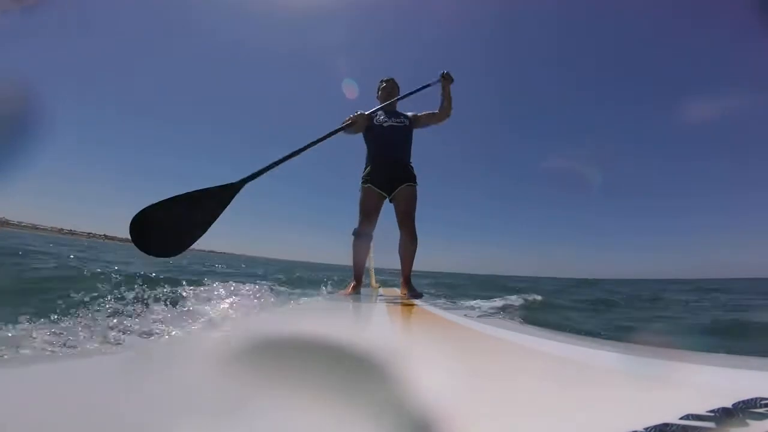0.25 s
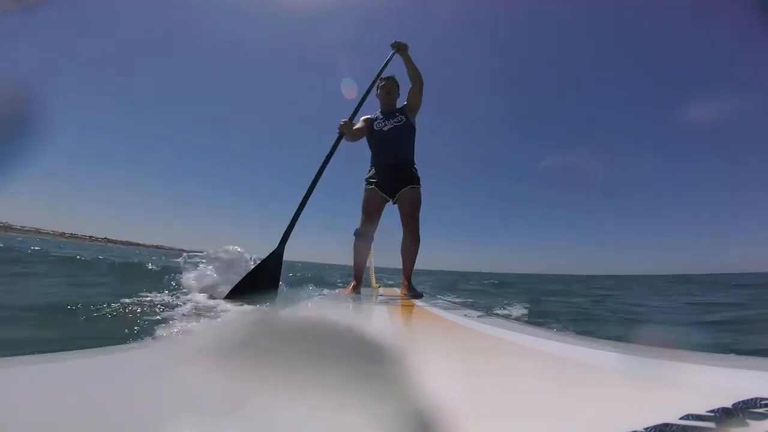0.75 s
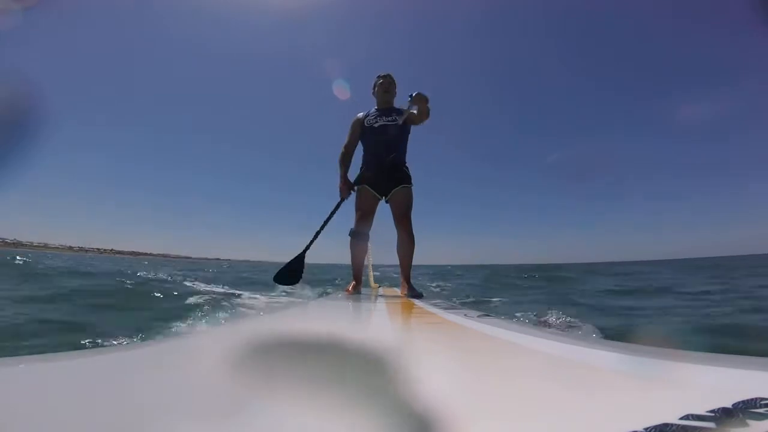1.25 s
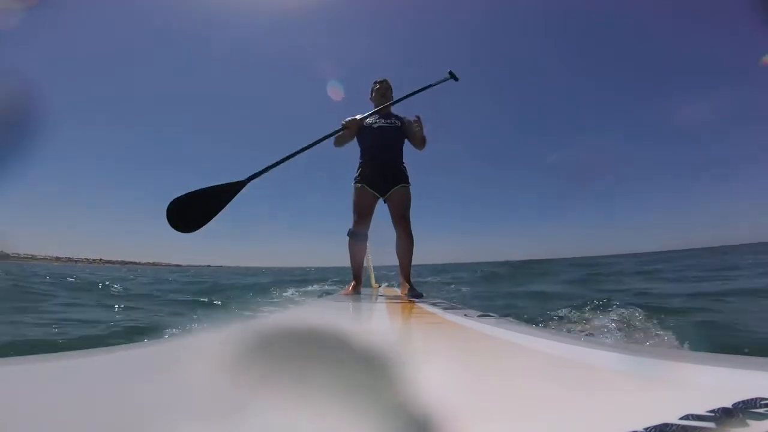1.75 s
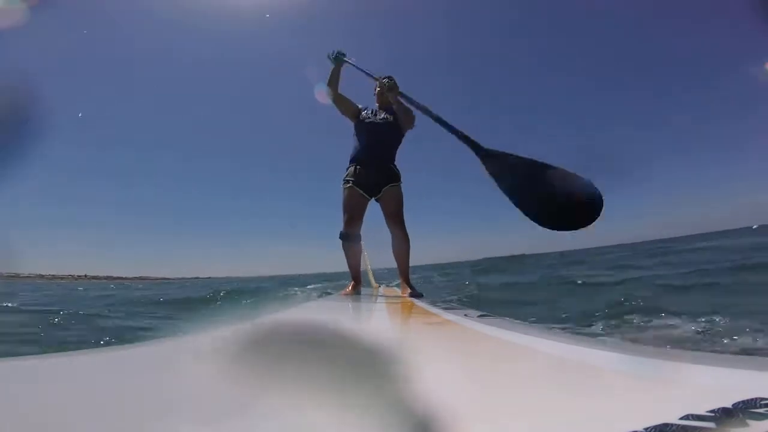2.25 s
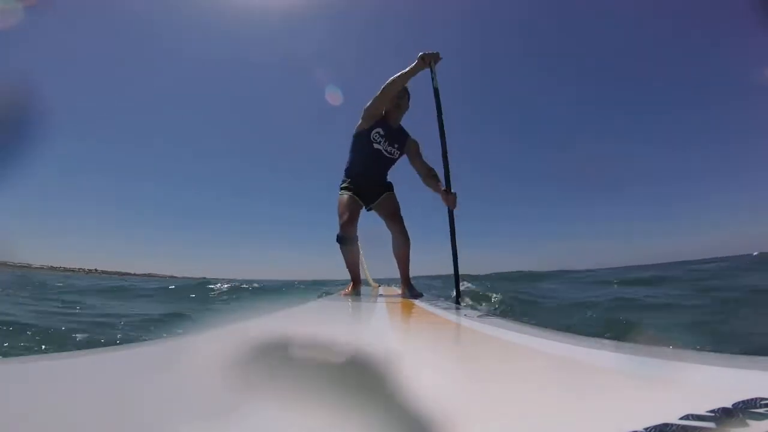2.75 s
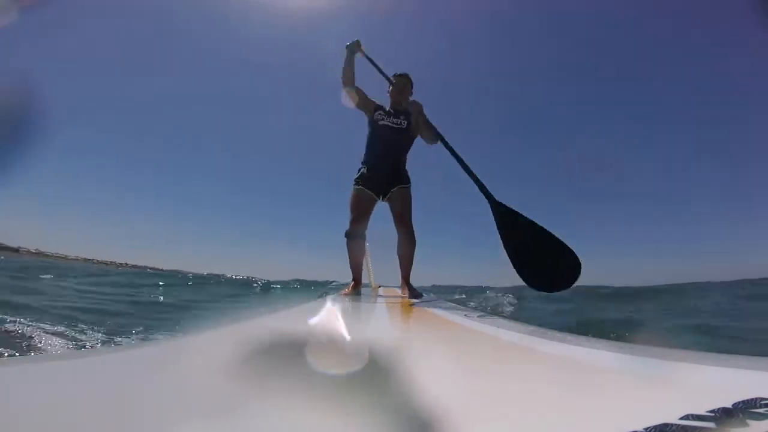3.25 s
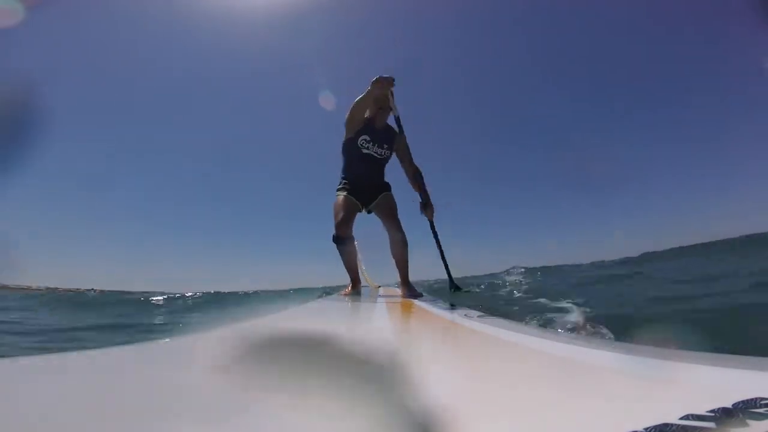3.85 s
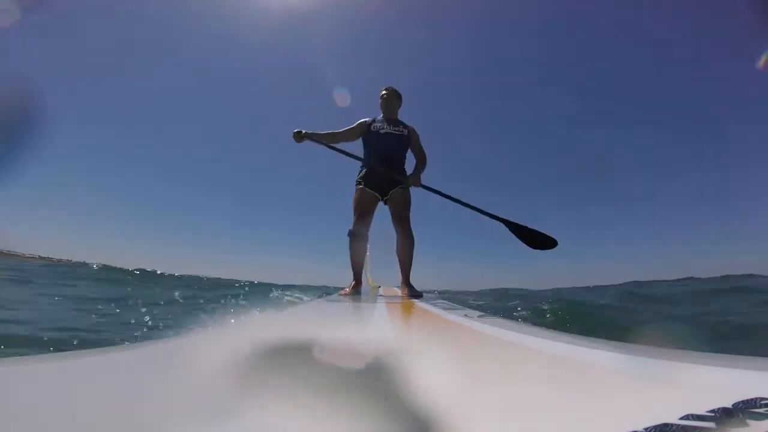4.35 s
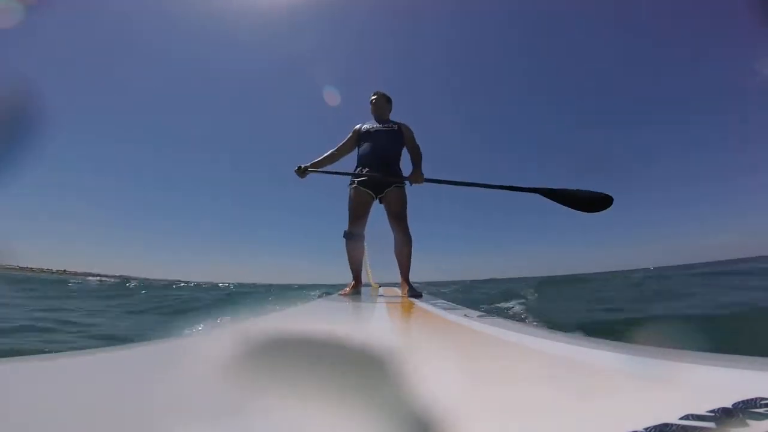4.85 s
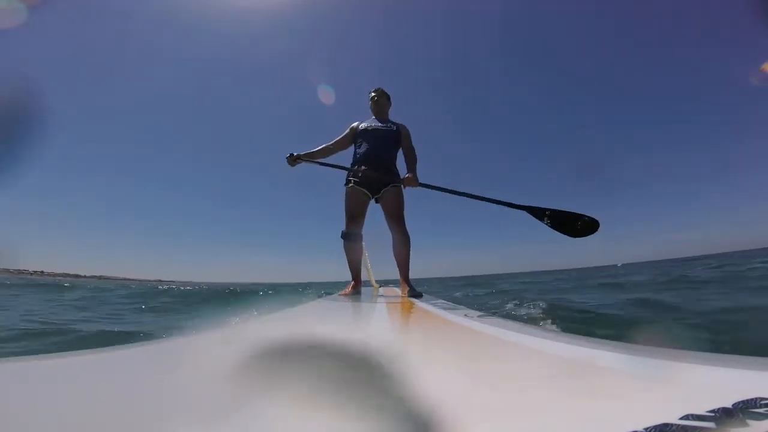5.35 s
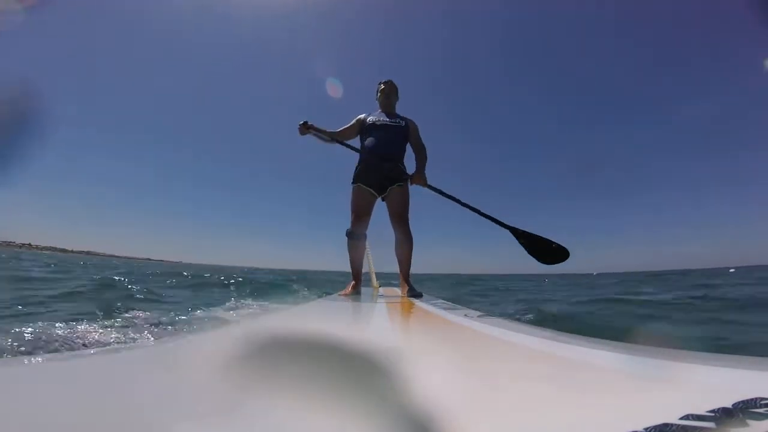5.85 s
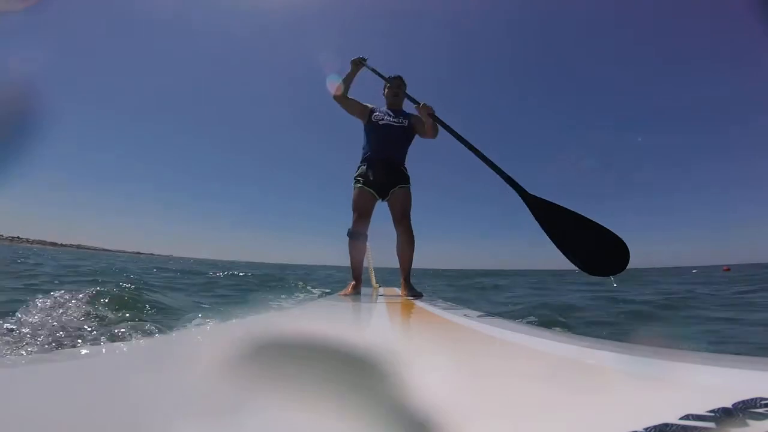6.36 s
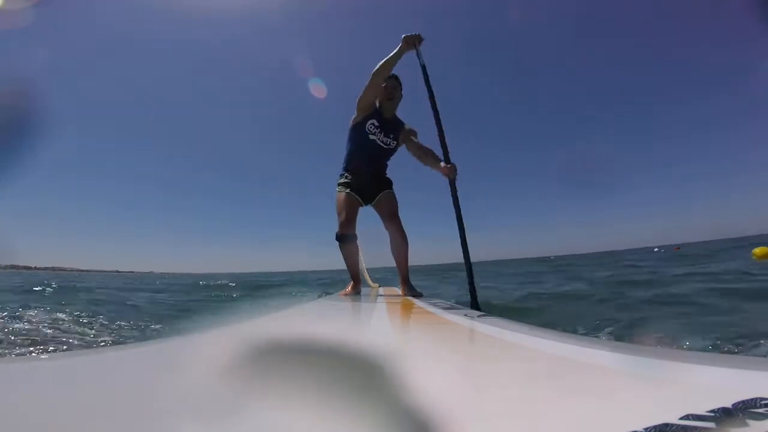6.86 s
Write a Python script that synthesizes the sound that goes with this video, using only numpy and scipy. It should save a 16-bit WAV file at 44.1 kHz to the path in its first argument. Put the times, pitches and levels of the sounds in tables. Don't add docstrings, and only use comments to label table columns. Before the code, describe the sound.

Hollow knocks, bubbling gulps and short slaps of water under a board on open sea, heard very close through a waterproof housing. Early hits and glugs give way to gusty low rumble and fizzing spray, then the densest pounding between four and five and a half seconds. The level drops suddenly, stays sparse, and droplets and gentler chop return at the end. Dry, dull, with no echo.

```python
import sys
import numpy as np
from scipy import signal
from scipy.fft import rfft, irfft
from scipy.io import wavfile
from scipy.ndimage import uniform_filter1d, minimum_filter1d

SR = 44100
rng = np.random.default_rng(int(sys.argv[2]) if len(sys.argv) > 2 else 0)


def digitize_waveform(pressure):
    field = np.atleast_2d(pressure).T
    bounded = np.clip(field, -1, 1)
    quanta = np.round(bounded * 32767).astype(np.int16)
    wavfile.write(sys.argv[1], SR, quanta)


def boost(x):
    u = np.asarray(x, float) / 20
    return 10 ** u


N = 312669

# time_s, level_db, gust_edge_db
WIND_LEVELS = [(0.1, -50, -8), (0.6, -42, -22.5), (1.05, -42, -35), (1.23, -44, -25), (2.53, -41, -8.5),
               (2.82, -29, -7), (2.94, -42.5, -7), (3.58, -34, -7.5), (3.78, -36.5, -1.5),
               (3.82, -21.5, -4.5), (4.17, -39, -14), (4.7, -36, -32.5), (4.83, -41, -24), (4.9, -34, -15),
               (5.92, -49, -6.5), (6.89, -36.5, -10), (7.03, -36, -13), (7.09, -44, 6)]
# start_s, peak_db, pitch_hz
SHOVES = [(0.59, -20, 35), (0.753, -21, 88), (0.793, -24, 88), (1.025, -18, 85), (2.13, -19.5, 177),
          (2.584, -20, 38.6), (2.697, -20, 56), (2.747, -16, 80.6), (2.794, -14, 102), (2.815, -14.5, 64),
          (2.878, -23, 37.3), (3.05, -30, 55), (3.14, -28, 40), (3.1, -21, 140), (3.258, -21, 66),
          (3.374, -15.5, 116), (3.389, -19, 35.2), (3.45, -31, 35.3), (3.539, -20, 71), (3.798, -12, 62.6),
          (3.815, -15, 62), (3.832, -15, 55), (3.845, -20, 130), (3.868, -17, 57), (3.94, -14, 40.2),
          (4.048, -21, 79), (4.246, -12, 83), (4.348, -20, 91), (4.407, -22, 94), (4.664, -27, 87),
          (5.16, -22, 86), (5.474, -16.5, 82), (6.695, -16, 184), (6.6, -21, 200), (6.996, -22, 113)]
# time_s, level_db
SPRAY_LEVEL = [(0.03, -55), (0.18, -52), (1.12, -54), (2.23, -53.5), (2.29, -57.5), (2.65, -48), (3.1, -46),
               (3.16, -39.5), (3.34, -45.5), (3.49, -46.5), (3.58, -58), (3.64, -50), (5.42, -49.5),
               (5.466, -60.5), (6.13, -54.5), (6.44, -49.5), (6.82, -55.5), (7.09, -52.5)]
# centre_s, over_steady_froth_db, length_s
FROTH_BURSTS = [(0.75, -3.5, 0.07), (2.408, 2, 0.0097), (2.633, 0.5, 0.014), (2.728, 3.5, 0.019),
                (2.85, 1, 0.13), (3.016, 4, 0.018), (3.135, 4, 0.019), (3.158, 0.5, 0.0091),
                (3.21, -2, 0.021), (3.242, -1, 0.0074), (3.26, 6.5, 0.018), (3.3, 3, 0.022),
                (3.347, 3, 0.019), (3.403, -3.5, 0.019), (3.438, 2, .01), (3.59, 2.5, 0.037),
                (4.037, -4, 0.037), (4.103, 4.5, 0.049), (4.237, 5.5, 0.045), (4.542, 7, 0.023),
                (6.014, -1, 0.035), (6.18, 1.5, 0.013), (6.653, 5, 0.11), (6.864, 6.5, 0.03)]
# pitch_hz, level_db (per Hz)
FROTH_SLOPE = [(210, -30), (350, -14), (493, -5), (771, -3.5), (2630, -9), (3400, -11.5), (4420, -24),
               (7480, -120)]
# start_s, peak_db, final_pitch_hz
DROPLETS = [(2.413, -25.5, 3840), (2.634, -20.5, 3500), (2.702, -25, 2100), (2.9774, -23, 2580),
            (3.006, -23, 2710), (3.133, -26, 3520), (3.163, -23, 1930), (3.262, -19, 3530),
            (3.27, -20, 1860), (3.335, -36, 3550), (3.356, -24, 2020), (3.436, -21, 3640),
            (3.546, -10, 3520), (3.625, -22, 3560), (3.6662, -24, 3900), (3.855, -22, 3240),
            (3.855, -21, 3950), (4.053, -22, 3480), (4.095, -25, 3680), (4.087, -21, 3170),
            (3.576, -31, 3500), (4.861, -24, 1990), (4.962, -21, 3070), (5.035, -23, 2960),
            (6.331, -24, 2400), (6.416, -12.5, 3780), (6.418, -20.5, 4850), (6.331, -25, 3260),
            (6.718, -24, 1940), (6.751, -24, 3460), (6.757, -27, 1900), (6.971, -30, 2340),
            (7.058, -23, 3330)]
# start_s, peak_db
SPRAY_TICKS = [(1.267, -39), (1.605, -37), (2.176, -37), (2.222, -31.5), (2.4448, -37), (2.6454, -33.5),
               (2.666, -25.5), (3.1403, -30), (3.164, -27), (3.1847, -28), (3.434, -34), (3.458, -30),
               (3.624, -27.5), (3.7683, -30.5), (3.8546, -30), (4.094, -28.5), (3.5455, -36), (4.9002, -36),
               (4.915, -27), (4.9472, -36), (5.214, -29), (6.052, -35), (6.415, -30.5), (6.7301, -29)]
# time_s, level_db
HULL_FLOW = [(0.03, -47.5), (0.39, -46), (0.41, -33.5), (1.22, -35.5), (2.27, -35), (2.34, -50),
             (2.61, -47.5), (2.74, -42.5), (3.15, -42), (4.3, -32.5), (4.83, -39), (4.87, -35.5),
             (5.42, -31), (5.55, -45.5), (5.8, -41), (6.14, -60), (6.4, -37), (6.85, -45)]
# crest_s, drumming_db, rushing_over_drumming_db, length_s
WAVELETS = [(0.59, -13, -9, 0.028), (0.735, -22.5, -10, .05), (1.02, -24.5, -3.5, 0.12),
            (1.473, -24.5, -4, 0.12), (1.76, -25.5, -1, 0.15), (1.973, -32.5, 4, 0.047),
            (2.059, -23.5, 0, 0.031), (2.256, -23.5, -5, 0.02), (3.26, -44, -4, 0.11),
            (3.542, -28, -8, 0.096), (3.635, -24.5, -1.5, 0.025), (3.84, -33, -9, 0.045),
            (3.962, -24.5, 5.5, 0.031), (4.117, -32, 3.5, 0.062), (4.186, -21.5, 1.5, 0.041),
            (4.316, -29.5, 4.5, 0.096), (4.375, -19, -18, 0.05), (4.446, -21.5, 2, 0.02),
            (4.579, -29.5, 8.5, 0.085), (4.971, -24.5, -2, 0.057), (5.06, -28.5, 7.5, 0.032),
            (5.4, -23.5, 0.5, 0.026), (5.475, -22.5, -1, 0.02), (5.587, -26.5, 0, 0.014),
            (5.63, -29.5, -3, 0.083), (6.226, -36, -6.5, 0.068), (6.395, -38, 2, 0.05),
            (6.527, -34.5, 0.5, 0.19), (6.693, -31.5, -3, 0.1), (6.977, -33, -24, 0.022)]
# start_s, peak_db, pitch_hz
HULL_GULPS = [(0.23, -19, 1250), (0.29, -19, 1200), (0.411, -25, 1110), (1.021, -11.5, 630),
              (1.16, -19, 890), (0.595, -15, 1410), (0.72, -9.5, 825), (1.19, -21, 1340),
              (1.244, -15, 1130), (1.354, -7, 1240), (1.562, -11, 1520), (2.145, -8.5, 1250),
              (2.184, -11, 1250), (2.288, -17, 1290), (2.49, -20.5, 585), (2.549, -15, 1090),
              (2.609, -31, 810), (2.645, -19, 1050), (2.662, -25, 1150), (2.831, -17, 1390),
              (2.862, -17, 915), (2.922, -20, 820), (3.009, -17, 1210), (3.039, -18, 1720),
              (3.435, -9, 1140), (3.471, -5.5, 1250), (3.716, -11.5, 1065), (3.937, -7.5, 1360),
              (3.965, -14, 1000), (3.854, -28, 1210), (4.151, -11, 1140), (4.223, -17, 905),
              (4.351, -6, 1250), (4.415, -16, 905), (4.43, -2, 607), (4.458, -4.5, 595), (4.527, -16, 856),
              (4.612, -13, 525), (4.709, -12.5, 1420), (4.856, -10, 1400), (4.918, -14, 1070),
              (5.024, -32, 1330), (5.19, -16, 1000), (5.314, -15, 890), (5.389, -9, 840), (5.582, -13, 920),
              (6.135, -31, 647), (6.234, -20, 610), (6.314, -18, 870), (6.405, -11.5, 940),
              (6.51, -16, 1190), (6.619, -9.5, 970), (6.731, -6.5, 1350), (6.826, -22, 1200),
              (6.846, -21, 774), (7.016, -25, 1030),
              (0.582, -3, 259), (0.605, -12, 610), (0.75, 0.5, 320), (0.975, -8, 288),
                   (1.05, -0.5, 285), (2.058, -6, 285), (3.26, -12, 1710), (3.541, -10, 288),
                   (3.962, -11, 474), (4.186, -10, 610), (4.223, -6, 520), (4.36, -8.5, 1260),
                   (4.367, -11.5, 433), (4.389, -10, 280), (4.415, -8, 600), (4.574, -12.5, 1070),
                   (4.583, -9, 826), (4.872, -9, 397), (4.9, -2.5, 310), (4.903, -13, 1470),
                   (4.919, 1.5, 660), (4.938, -10, 1430), (5.036, -7, 277), (5.046, -10, 1310),
                   (5.347, -10, 650), (5.391, -8, 406), (6.47, -23, 420)]
# start_s, peak_db, pitch_hz, length_s
SKIN_SLAPS = [(0.406, -14, 560, 0.0073), (0.536, -16, 544, 0.068), (0.988, -17, 457, 0.033),
              (1.022, -19, 606, 0.031), (1.161, -15, 458, 0.019), (1.543, -16, 530, 0.008),
              (1.922, -20, 1110, 0.0085), (2.12, -12.5, 503, 0.024), (2.178, -17, 393, 0.0027),
              (2.705, -21.5, 860, 0.012), (3.121, -21, 1100, 0.0089), (3.23, -18, 614, 0.0052),
              (3.261, -27, 1410, 0.064), (3.428, -16, 1010, 0.015), (3.93, -19, 616, 0.016),
              (4.167, -16, 550, 0.013), (4.19, -21, 566, 0.0043), (4.227, -7.5, 536, 0.012),
              (4.343, -14.5, 497, 0.029), (4.421, -9.5, 580, 0.017), (4.53, -22, 430, 0.0052),
              (4.541, -10.5, 452, 0.074), (4.706, -13.5, 620, 0.006), (4.869, -15, 456, 0.063),
              (4.913, -7.5, 652, 0.011), (4.95, -19, 564, 0.035), (5.024, -7.5, 596, 0.0099),
              (5.191, -15, 595, 0.022), (5.317, -14.5, 590, 0.021), (5.339, -8.5, 598, 0.0091),
              (5.436, -13, 620, 0.047), (5.462, -14.5, 417, 0.055), (5.587, -16.5, 510, 0.042),
              (5.671, -17.5, 595, 0.0096), (5.778, -28, 620, 0.014), (6.362, -21, 620, 0.011),
              (6.407, -27, 897, 0.0053), (6.464, -21.5, 1170, 0.022), (6.694, -22.5, 950, 0.013)]
# start_s, peak_db, pitch_hz, t60_s
PANEL_BOOMS = [(0.41, -14, 280, 0.015), (0.573, -14.5, 253.5, 0.25), (0.708, -12, 272, 0.24),
               (0.815, -19, 284, 0.12), (0.873, -20, 277, 0.13), (0.961, -12.5, 270, 0.042),
               (1.028, -23, 304, 0.17), (1.179, -17, 278, 0.11), (1.303, -19, 309, 0.074),
               (1.439, -22, 274, 0.059), (1.485, -10, 287, 0.086), (1.676, -13, 315, 0.054),
               (1.746, -11, 360, 0.026), (1.772, -20, 298, 0.058), (1.963, -17.5, 314, 0.031),
               (2.038, -23, 279, 0.13), (2.055, -20, 293, 0.026), (2.113, -18, 337, 0.036),
               (2.23, -20, 304, 0.058), (2.253, -16, 277, 0.026), (3.19, -24, 307, 0.081),
               (3.267, -18, 294, 0.053), (3.345, -24.5, 292, 0.054), (3.482, -22, 296, 0.086),
               (3.538, -23, 291, 0.065), (3.629, -22, 289, 0.044), (3.972, -6.5, 280, 0.1),
               (4.18, -8, 272, 0.23), (4.29, -16, 287, 0.08), (4.35, -12, 281.5, 0.14),
               (4.426, -11.5, 286, 0.069), (4.53, -12.5, 280, 0.051), (4.568, -8, 276, 0.13),
               (4.612, -9, 353, 0.02), (4.874, -13, 305, 0.045), (4.982, -10.5, 282, 0.063),
               (5.244, -18, 272, 0.081), (5.341, -10, 293, 0.084), (5.465, -1, 286, 0.087),
               (5.6, -17.5, 376, 0.1), (5.75, -30.5, 280, 0.17), (5.83, -30.5, 288, 0.087),
               (6.366, -31, 280, 0.044), (6.411, -15.5, 284, 0.016), (6.457, -20, 262, 0.055),
               (6.511, -14.5, 272, 0.034), (6.566, -18, 279, 0.043), (6.618, -22.5, 291, 0.13),
               (6.689, -22, 275, 0.036), (6.945, -24, 297, 0.064)]
# pitch_hz, width_hz, level_db
PANEL_MODES = [
    (88, 5.6, -8),
    (272, 28.1, 7),
    (326.5, 76, -1.5),
]
# pitch_hz, width_hz, level_db
SKIN_MODES = [(388, 61, 5.5), (480, 87, 4), (574, 26, 1.5), (638, 24, 0), (867, 110, -2), (1000, 227, -1.5),
              (1250, 100, -0.5), (1417, 130, -8.5)]
# pitch_hz, width_hz, level_db
CAVITY_MODES = [
    (3520, 330, 5.5),
    (5070, 530, -16.5),
    (6486, 260, -1),
    (7660, 3480, -11.5),
    (8650, 280, -4.5),
]
# time_s, null_hz
NULL_PATH = [(0, 4150), (1.0, 4020), (2.1, 4000), (3.0, 4090), (3.6, 4100), (3.95, 4480), (4.45, 4300),
             (4.68, 4200), (5.4, 4060), (6.2, 4110), (7.09, 4120)]
# low_hz, high_hz, threshold_over_region_mean_db
EMPTIED_BANDS = [
    (3000, 4600, -16.5),
    (8200, 9900, -10),
    (10300, 14500, 1.5),
]
# time_s, low_hz, high_hz
HISS_EDGES = [(0.6, 12200, 12700), (1.2, 11300, 13600), (2.3, 11000, 14100), (3.2, 11900, 14200),
              (3.5, 11400, 14000), (3.6, 11100, 12900), (4.5, 11600, 12700), (4.8, 11100, 13200),
              (5.4, 11500, 13000), (5.55, 12000, 12100), (5.9, 11500, 13800), (6.6, 11800, 13400),
              (6.8, 11100, 12900)]


def rms_one(x):
    return x / np.sqrt(np.mean(x ** 2) + 1e-20)


def in_time(rows):
    s, *columns = np.transpose(rows)
    return [np.interp(np.arange(N) / SR, s, column) for column in columns]


def drift(rate_hz):
    r = np.exp(-40 * np.pi * rate_hz / SR)
    slow = signal.lfilter([1], [1, -2 * r, r * r], rng.standard_normal(N // 20 + 2002))[2000:]
    return np.interp(np.arange(N) / 20, np.arange(len(slow)), rms_one(slow))


def resonance(x, hz, width_hz):
    r = np.exp(-np.pi * width_hz / SR)
    poles = [1, -2 * r * np.cos(2 * np.pi * hz / SR), r * r]
    return signal.lfilter([(1 - r * r) / 2, 0, (r * r - 1) / 2], poles, x + 1e-18)


def body(x, modes):
    return sum((-1) ** k * boost(db) * resonance(x, hz, width) for k, (hz, width, db) in enumerate(modes))


def sos_filter(x, order, hz, kind="low"):
    return signal.sosfilt(signal.butter(order, hz, kind, fs=SR, output="sos"), x)


def grains(per_s, spread_db):
    sizes = boost(spread_db * np.minimum(rng.exponential(1, N), 5)) * rng.choice([-1, 1], N)
    return rms_one(sizes * (rng.random(N) < per_s / SR))


def evened(x, window_s):
    power = uniform_filter1d(x ** 2, size=int(window_s * SR)) / np.mean(x ** 2)
    return rms_one(x / (power + 0.05) ** 0.4)


def add(out, s, sound):
    at = max(round(s * SR), 0)
    out[at:at + len(sound)] += sound[:N - at]


def swell(t, rise_s, fall_s):
    shape = (1 - np.exp(-t / rise_s)) ** 2 * np.exp(-t / fall_s)
    return shape / shape.max()


def air(size=1024):
    hz, t, frames = signal.stft(rng.standard_normal(N), SR, nperseg=size)
    at = np.minimum((t * SR).astype(int), N - 1)
    low, high = [edge[at] + 300 * drift(20.0)[at] for edge in in_time(HISS_EDGES)]
    inside = (hz[:, None] > low) & (hz[:, None] < high)
    started = t > 0.62
    return signal.istft(frames * inside * started, SR, nperseg=size)[1][:N] * np.sqrt(10)


def hull_water():
    t = np.arange(0, N + 64, 64) / SR
    drum_db = np.interp(t, *np.transpose(HULL_FLOW))
    mean_db = drum_db.mean()
    rush_db = mean_db + 1.12 * (drum_db - mean_db) - 0.5
    for s, db, rush_over_db, length in WAVELETS:
        shape_db = db - 10 * np.abs(t - s) / max(length, 0.005)
        drum_db = np.maximum(drum_db, shape_db)
        rush_db = np.maximum(rush_db, shape_db + rush_over_db)
    return [np.interp(np.arange(N) / SR, t, level) for level in (drum_db, rush_db)]


def wind():
    level_db, edge_db = in_time(WIND_LEVELS)
    white = rng.standard_normal((3, N))
    buffet = evened(resonance(sos_filter(white[0], 2, 25, "high"), 34, 47.0), 0.16)
    bending = evened(resonance(white[2], 83.3, 20.0), 0.17)
    flexed = boost(0.44 * (hull_water()[0] - in_time(HULL_FLOW)[0] - 4.0))
    calm = np.clip(-edge_db / 36.0, 0, 1)
    low = sos_filter(buffet * (1 - 0.5 * calm) + 1.73 * calm * flexed * bending, 8, 115)
    edge = evened(sos_filter(white[1], 2, [120, 240], "band"), 0.11)
    return boost(level_db + 0.5 * drift(14.0)) * (low + boost(edge_db - 1.0) * edge)


def thumps():
    out, t = np.zeros(N), np.arange(SR // 5) / SR
    for s, db, hz in SHOVES:
        swing = swell(t, 0.61 / hz, 0.8 / hz) * np.sin(2 * np.pi * hz * t)
        add(out, s - 0.004, boost(db - 8.0) * swing)
    return out


def pop(start_s=0.0052, level_db=-6.5):
    step = boost(level_db) * (np.arange(N) >= start_s * SR)
    return sos_filter(step, 2, 48, "high") + 1.1 * body(step, CAVITY_MODES)


def froth_level():
    (fizz_db,), (flow_db,) = in_time(SPRAY_LEVEL), in_time(HULL_FLOW)
    froth_db = -49.5 + 0.97 * (fizz_db - fizz_db.mean()) + 0.019 * (flow_db - flow_db.mean())
    t = np.arange(N) / SR
    for s, db, length in FROTH_BURSTS:
        near = slice(max(int((s - 0.5) * SR), 0), int((s + 0.5) * SR))
        froth_db[near] += db * np.exp(-((t[near] - s) / max(length, 0.004)) ** 2)
    return froth_db


def spray():
    shared_db = 0.5 * drift(25.0) + 1.68 * drift(82.0)
    fizz = (rng.standard_normal(N) + 0.5 * grains(1200, 4.2)) * boost(shared_db + 0.9 * drift(40.0))
    froth = (rng.standard_normal(N) + 0.45 * grains(500, 4.0)) * boost(shared_db + 1.2 * drift(20.0))
    hz = np.maximum(np.arange(N // 2 + 1) * SR / N, 1)
    corner_hz, corner_db = np.transpose(FROTH_SLOPE)
    slope_db = np.interp(np.log(hz), np.log(corner_hz), corner_db)
    broad = rms_one(irfft(rfft(froth) * boost(slope_db), N))
    blips = sum(resonance(grains(42 / 6, 3.2), pitch, pitch / 13.0) for pitch in np.geomspace(800, 1500, num=6))
    lower = broad + 0.4 * rms_one(body(froth, CAVITY_MODES[:1])) + boost(-8) * rms_one(blips)
    upper = rms_one(body(fizz, CAVITY_MODES[1:]))
    return boost(in_time(SPRAY_LEVEL)[0]) * upper + boost(froth_level() + 4.5) * lower


def drops():
    out, ticks, t = np.zeros(N), np.zeros(N), np.arange(SR // 50) / SR
    for s, db, hz in DROPLETS:
        cycles = hz * (t - 0.0003 * (1 - np.exp(-t / 0.001)))
        bubble = np.sin(2 * np.pi * cycles) * swell(t, 0.00025, 4.5 / hz)
        push = min(boost(db + 8.0), 1) * swell(t, 0.00027, 0.00058)
        add(out, s - 0.0005, boost(db - 5.0) * (bubble - push))
    for (s, db), crack in zip(SPRAY_TICKS, rng.standard_normal((len(SPRAY_TICKS), 160))):
        add(ticks, s, boost(db + 19.5) * crack * np.exp(-t[:160] / 0.00077))
    return out + body(ticks, CAVITY_MODES[1:])


def wash():
    drum_db, rush_db = hull_water()
    surge_db = 1.5 * drift(25.0)
    drum = evened(body(grains(1500, 3.44) * boost(surge_db), PANEL_MODES), 0.059)
    rush = np.zeros(N)
    for hz, width, db in SKIN_MODES:
        flicker_db = 3.5 * drift(14.0)
        rush += boost(db + surge_db + flicker_db) * rms_one(resonance(grains(600, 2.0), hz, width))
    return boost(drum_db + 1.5) * drum + boost(rush_db - 0.5) * evened(rush, 0.062)


def gulps():
    out, t = np.zeros(N), np.arange(SR // 20) / SR
    for s, db, hz in HULL_GULPS:
        ring = np.sin(2 * np.pi * hz * (t + 2.0 * t * t))
        add(out, s - 0.001, boost(db - 13.0) * swell(t, 0.00065, 3.0 / hz) * ring)
    return out


def slaps():
    out, t = np.zeros(N), np.arange(SR // 10) / SR
    for (s, db, hz, length), noise in zip(SKIN_SLAPS, rng.standard_normal((len(SKIN_SLAPS), len(t)))):
        patter = noise * swell(t, 0.00061, max(length, 0.002))
        ring = body(patter, SKIN_MODES) + 3.57 * resonance(patter, hz, 0.095 * hz)
        add(out, s - 0.002, boost(db - 5.0) * ring / np.abs(ring).max())
    return out


def booms():
    out, t = np.zeros(N), np.arange(SR // 4) / SR
    phases = rng.uniform(0, 2 * np.pi, len(PANEL_BOOMS))
    for (s, db, hz, t60), phase in zip(PANEL_BOOMS, phases):
        ring = np.sin(2 * np.pi * hz * (t - 0.45 * t * t) + phase)
        envelope = swell(t, 0.0056, max(t60, 0.015) / np.log(1000))
        add(out, s - 0.004, boost(db - 2.5) * envelope * ring)
    return out


def mount(x):
    x = sos_filter(x, 2, 2600)
    return x - resonance(x, 168, 78.0)


def port(x, width_hz=474.0, split_hz=60.0, size=256):
    null_hz = in_time(NULL_PATH)[0] + 60.0 * drift(11.0)
    out, state, r = np.empty(N), np.zeros(4), np.exp(-np.pi * width_hz / SR)
    for i in range(0, N, size):
        low, high = np.cos(2 * np.pi * (null_hz[i] + np.array([-split_hz, split_hz])) / SR)
        zeros = np.convolve([1, -2 * low, 1], [1, -2 * high, 1])
        poles = np.convolve([1, -2 * r * low, r * r], [1, -2 * r * high, r * r])
        out[i:i + size], state = signal.lfilter(zeros, poles, x[i:i + size], zi=state)
    return out


def scene():
    hull = mount(wash() + gulps() + slaps() + booms())
    return port(wind() + thumps() + pop() + spray() + drops() + hull)[None, :]


def limiter(x, limit=0.55):
    needed = np.minimum(1, limit / (np.abs(x) + 1e-9))
    return x * uniform_filter1d(minimum_filter1d(needed, size=401), size=401)


def gain_clamp(x, start_s=5.417, depth_db=-10.0, recovery_s=0.02):
    since = np.arange(N) / SR - start_s
    return x * boost(depth_db * (since > 0) * np.exp(-np.maximum(since, 0) / recovery_s))


def dropouts(x, size=2048, count=4):
    hz, _, frames = signal.stft(x, SR, nperseg=size)
    bands = np.abs(frames[:-1].reshape(-1, count, frames.shape[1]) ** 2).mean(axis=1)
    power = np.repeat(bands, count, axis=0)
    for low, high, under_db in EMPTIED_BANDS:
        region = np.flatnonzero((hz >= low) & (hz < high))
        usual = minimum_filter1d(power[region].mean(axis=0), size=3)
        frames[region] *= power[region] > boost(2 * under_db) * usual
    return signal.istft(frames, SR, nperseg=size)[1][None, :N]


def band_limit(x):
    return signal.sosfilt(signal.butter(12, 14250, fs=SR, output="sos"), x)


def record(dry):
    held = gain_clamp(limiter(dry))
    cut = signal.sosfilt(signal.cheby2(20, 80, 9937 + 150, fs=SR, output="sos"), held)
    hiss = boost(-85 + 0.6 * (in_time(SPRAY_LEVEL)[0] + 57.5)) * air()
    mix = dropouts(cut[0] + hiss)
    return band_limit(mix)


dry = scene()
out = record(dry)
digitize_waveform(out)
```